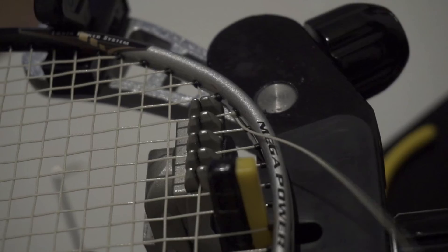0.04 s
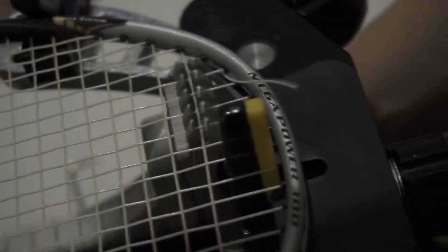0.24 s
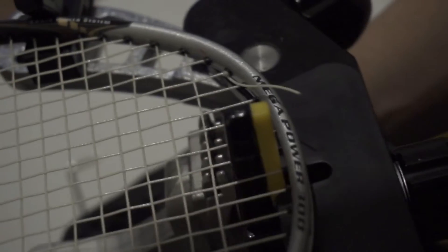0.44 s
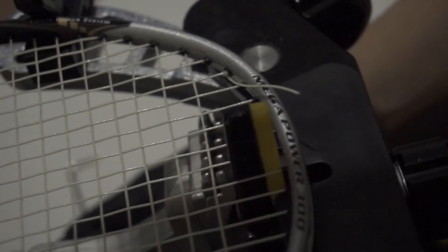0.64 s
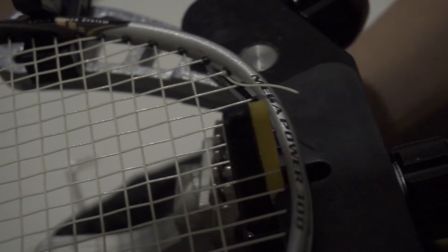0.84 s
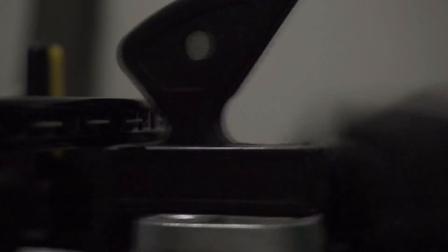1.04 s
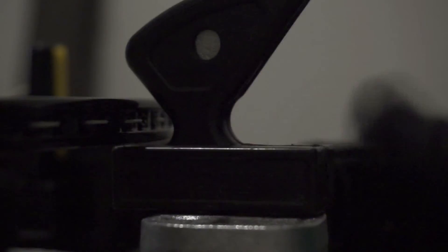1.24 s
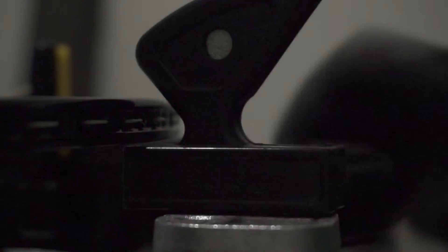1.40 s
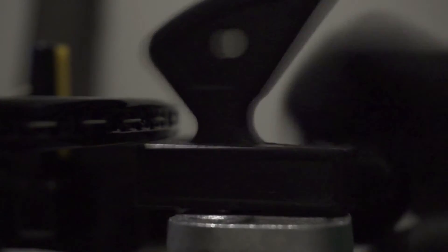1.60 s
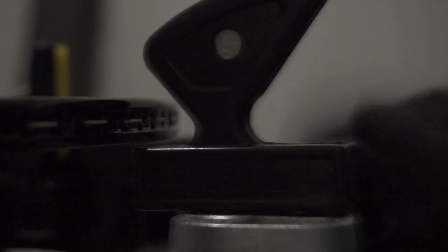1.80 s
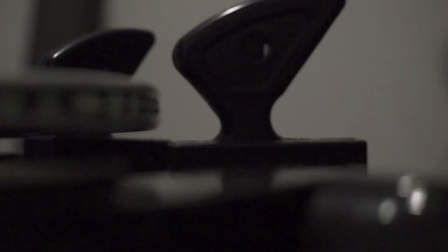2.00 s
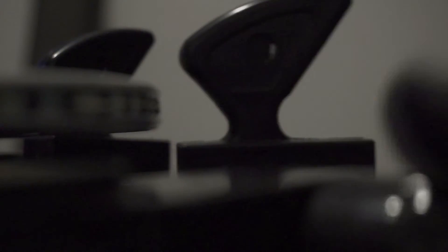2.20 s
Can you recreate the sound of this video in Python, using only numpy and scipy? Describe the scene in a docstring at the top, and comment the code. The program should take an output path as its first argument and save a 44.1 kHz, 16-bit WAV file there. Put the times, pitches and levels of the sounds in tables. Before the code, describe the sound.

A steel clamp on a racquet stringing machine chinks, slides and clacks shut, then its lever snaps over and the racquet rings briefly. Softer knocks and short creaks follow from the mount, heard close in a small, live room.

```python
"""A soft, low knock comes first, then a steel string clamp chinks, slides and clacks shut.
We are close to a racquet stringing machine in a small, live room, the machine a little left of the
microphone. The lever snaps over and the strung racquet rings. Then the mount is adjusted: short
stick-slip creaks run into soft knocks on the hollow base. Small metal pings sound along the way,
and one tiny metal tick comes last, over faint room noise."""
import sys
import numpy as np
from scipy import signal
from scipy.fft import rfft, irfft
from scipy.io import wavfile

SR = 44100
rng = np.random.default_rng(int(sys.argv[2]) if len(sys.argv) > 2 else 0)


def to_wav(sig):
    """Store sig (one row per channel, or 1-D mono) as 16-bit WAV at the path in sys.argv[1].

    Samples outside -1..1 are clipped; the rate is SR.
    """
    pcm = np.clip(np.atleast_2d(sig), -1, 1) * 32767
    pcm = np.round(pcm).astype(np.int16)
    wavfile.write(sys.argv[1], SR, pcm.T)  # frames by channels


N = 103635
T = np.arange(N) / SR

# the room's decay: freq_hz, t60_s
ROOM_T60 = [(150, 0.2), (500, .5), (1200, 0.4948), (3000, .5), (6000, 0.4551), (11000, 0.31)]
# the colour of its tail: freq_hz, gain_db
ROOM_TONE = [(100, -3.5), (200, 3.5), (500, 3.5), (1000, -2), (2000, 1.5), (4000, 6.5), (7000, 2),
             (11000, 2)]
# its stereo width at the microphone: freq_hz, side_over_mid_db
ROOM_WIDTH = [(200, -15), (700, -7.5), (1400, -2.5), (2800, 0.5), (6000, -0.5), (11000, -3.5)]
# spectrum of the quiet room: freq_hz, relative_db
ROOM_NOISE = [(30, -30), (100, -20), (250, -4.5), (500, 14.5), (800, 4), (1400, 5.5), (3000, -6),
              (5000, -8.5), (11000, -10)]
# metal pings and low tones of soft knocks: start_s, level_db, pitch_hz, swell_s, t60_s, room_send_db
PITCHED_RINGS = [(0.001, -25, 660, .002, .08, -2), (0.168, -15, 1020, .005, .04, -2),
                 (0.556, -34, 740, .004, .06, 0), (0.166, -9, 10660, .002, .05, -9.5),
                 (0.2843, -10.5, 5390, 0.0014, 0.039, -5), (0.319, -7.5, 3200, .0005, 0.021, -3),
                 (0.321, -13, 5250, .0005, .03, -9), (0.321, -15.5, 8280, .0005, 0.021, -2.5),
                 (1.297, -24, 2500, 0.0025, .02, -2), (1.493, -32, 1650, .001, .015, -6),
                 (1.564, -34.5, 5400, 0.00085, 0.026, 1.5), (1.824, -37, 3722, 0.043, 0.1, -5.5),
                 (1.96, -34, 1284, .05, 0.22, -7.5), (2.018, -33, 530, .005, .03, 3),
                 (2.077, -30.5, 1450, .002, .035, -7)]
# knocks on the base: start_s, level_db, bass_db, bite_db, treble_db, grind_s, room_send_db, ring_db
BASE_KNOCKS = [(0.002, -25, 14.5, -6.5, 0, 0.0026, 7, -20), (0.867, -19.5, -5, -4.5, -12, .005, 1, -10.5),
               (0.911, -27, 5, 1, -6, 0.0036, -18, -18), (1.033, -20, 2, 0.5, -1, 0.007, 2.5, -1.5),
               (1.056, -29.5, 13, -1, 8, 0.009, 6.5, -0.5), (1.24, -30.5, 11, 2, 2, .008, 1.5, 2),
               (1.300, -15, -1, 1.5, -6, 0.0083, 2, -4), (1.493, -27.5, -1.5, -1, -1.5, 0.0041, -1, -1.5),
               (1.562, -17, -1.5, -3, 3, 0.0015, 4, 3), (1.577, -20.5, 4.5, -6, 0, 0.0047, -3.5, -5),
               (1.757, -30, -3, 7, 10, .004, 1, -1), (1.832, -32.5, 9, -1.5, -0.5, 0.0033, 2.5, 0.5),
               (2.019, -37.5, -2, -9, -5.5, 0.0023, -4.5, 8.5), (2.077, -34, -11, -18, -8, 0.0018, -0.5, 9)]
# creaks of the mount: start_s, length_s, level_db, bass_db, bite_db, treble_db
MOUNT_CREAKS = [(0.881, 0.08, -60.5, -2.5, -4, -19), (0.996, 0.029, -54, 2.5, -1, -2),
                (1.266, 0.065, -54.5, 9.5, 1.5, 8), (1.526, 0.042, -48.5, -10.5, 4.5, -1),
                (1.781, 0.059, -59, 4.5, 1, 5.5), (1.87, 0.061, -69, -2, -9, -6)]
# broad resonances of the hollow base: centre_hz, width_hz, gain_db
BASE_BODY = [(231.5, 61, -6.5), (515, 95, -1), (880, 190, -6.5), (1158, 128, 4.5), (1577, 196, 2.5),
             (2260, 278, -0.5), (2624, 496, -4), (3970, 133, -23), (5400, 200, -45), (10260, 1200, -28.5)]
# long ringing modes of the base: pitch_hz, gain_db, t60_s
BASE_MODES = [(240, -16.5, 0.5), (274, -14, 0.36), (452, -5.5, 0.42), (495.8, 3.5, 0.42),
              (514.5, 1.5, 0.37), (576, -2.5, 0.4), (591.4, -12, 0.32), (1130, -13.5, 0.39),
              (1172, -13.5, 0.31), (1417, -9, 0.46), (1470, -8.5, .4), (1533, -9.5, 0.29)]
# blows of the clamp: start_s, level_db, bass_db, bite_db, treble_db, grind_s, room_send_db, ring_db
CLAMP_CLACKS = [(0.0445, -17, -6.5, -4.5, -7, 0.0062, 7, -9), (0.056, -26.5, 18, -4, -9, 0.0059, -3, 1),
                (0.167, -8, 7, -3, 22.5, 0.0085, -0.5, -23.5),
                (0.1755, -5.5, -8, 1, 17.5, 0.012, -16.5, -24),
                (0.184, -9, -8.5, 0, -3.5, 0.003, -1, -13.5),
                (0.217, -10, -14.5, -2.5, 0, 0.0072, 1.5, -7.5),
                (0.286, -12.5, 4.5, 1, 8.5, 0.005, -2.5, -6), (0.291, 2, 0, -3.5, 2, 0.0017, -2.5, 0.5),
                (0.320, -4.5, 1.5, 4, 7.5, 0.0038, -3.5, -23.5), (0.368, -9, 12.5, -1, 3, 0.0021, -1, -11),
                (0.681, -32, -3, -3, -4, .004, -3, -15), (0.687, -22.5, -14, -6, -8.5, 0.0053, 14, 5),
                (0.694, -0.5, -11.5, -1, -6.5, 0.0016, -1.5, 1.5),
                (0.769, -12, -4, 8, -1.5, 0.0026, 3.5, 5)]
# slides of the clamp: start_s, length_s, level_db, bass_db, bite_db, treble_db
CLAMP_SLIDES = [(0.189, 0.12, -44.5, -4.5, 0.5, 3), (0.711, 0.14, -44.5, -5.5, 2.5, -20)]
# broad resonances of the steel clamp: centre_hz, width_hz, gain_db
CLAMP_BODY = [(185, 126, -14.5), (546, 87, 0), (830, 130, 0), (1140, 153, 2.5), (1460, 140, -1),
              (1720, 220, -3), (2290, 390, -6), (3070, 590, -7.5), (4460, 350, -14), (4980, 460, -12),
              (6730, 1600, -17), (8160, 1320, -16), (10800, 900, -21)]
# long ringing modes of the strung racquet: pitch_hz, gain_db, t60_s
RACQUET_MODES = [(181.1, -20, .6), (493.4, -8.5, 0.79), (534, -10.5, 0.38), (582, 1, 0.31),
                 (629, 0.5, 0.21), (814, -7, 0.34), (913, -14.5, 0.79), (949, -5, 0.21), (1120, 1, 0.25),
                 (1401, -13, 0.3), (1753, -10.5, 0.33), (1870, -22.5, 0.5), (3037, -15.5, .4),
                 (3145, -13.5, .4), (3230, -16, .45)]
# pushes of the clamp on the stand: start_s, level_db
STAND_THUMPS = [(0.169, -37.5), (0.695, -33)]
# the stand's low resonance: centre_hz, width_hz, gain_db
STAND_BODY = [(60, 50, 0)]
# brief dips in level (a negative depth is a lift): centre_s, half_width_s, depth_db
LEVEL_DIPS = [(0.159, 0.0022, 19), (0.86, 0.0034, -1)]

BASS_HZ, BITE_HZ, TREBLE_HZ, BITE_DAMPING = 477, 2700, 4500, 0.8   # tone of each blow and rub
GRIT_HZ, GRIT_DB = 1390, 0.5   # metal faces grind as they meet: click below GRIT_HZ, grit above
SLIPS_PER_S, RUB_ROOM_DB = 900, -1


def from_db(db):
    """Decibels to gain."""
    return 10 ** (np.asarray(db) / 20)


def at_hz(points, hz):
    """Read a table on a log-frequency axis."""
    freqs, values = np.transpose(points)
    return np.interp(np.log(hz + 1e-9), np.log(freqs), values)


def unit(x):
    """Scale to an energy of one."""
    return x / np.sqrt(np.sum(x ** 2) + 1e-20)


def add(track, start_s, x):
    """Mix a sound into a track at a time."""
    i = int(start_s * SR)
    track[i:i + len(x)] += x[:N - i]


def butter(x, hz, kind):
    """Second-order filter."""
    return signal.sosfilt(signal.butter(2, hz, kind, fs=SR, output="sos"), x + 1e-18)


def tone(x, bass_db, bite_db, treble_db):
    """A low shelf, a high shelf and a broad peak between them for the hard bite."""
    for hz, low_db, high_db in ((BASS_HZ, bass_db, 0), (TREBLE_HZ, 0, treble_db)):
        w, g = 2 * SR * np.tan(np.pi * hz / SR), from_db((low_db - high_db) / 4)
        shelf = [1, np.sqrt(2) * w * g, (w * g) ** 2], [1, np.sqrt(2) * w / g, (w / g) ** 2]
        x = from_db(high_db) * signal.lfilter(*signal.bilinear(*shelf, SR), x)
    w, g = 2 * np.pi * BITE_HZ, from_db(bite_db / 2)
    peak = [1, BITE_DAMPING * w * g, w * w], [1, BITE_DAMPING * w / g, w * w]
    return signal.lfilter(*signal.bilinear(*peak, SR), x)


def body(force, resonances):
    """A force drives broad resonances in parallel, signs alternating."""
    out = 0
    for k, (hz, width_hz, db) in enumerate(resonances):
        radius = np.exp(-np.pi * width_hz / SR)
        feedback = [1, -2 * radius * np.cos(2 * np.pi * hz / SR), radius ** 2]
        band = (1 - radius ** 2) / 2 * signal.lfilter([1, 0, -1], feedback, force + 1e-18)
        out += (-1) ** k * from_db(db) * band
    return out


def mode(hz, swell_s, t60_s):
    """A sine that swells and dies away."""
    t = T[:SR]
    return np.sin(2 * np.pi * hz * t) * (1 - np.exp(-t / swell_s)) * from_db(-60 * t / t60_s)


def wide_noise(size):
    """Frequencies and spectrum of stereo noise, narrow in the bass and wide in the treble."""
    hz = np.linspace(0, SR / 2, size // 2 + 1)
    mid, side = rfft(rng.standard_normal((2, size)))
    width = from_db(at_hz(ROOM_WIDTH, hz))
    return hz, (mid + side * width * [[1], [-1]]) / np.sqrt(1 + width ** 2)


def room_noise(rms_db=-64.5):
    """The place itself: steady faint noise and hiss all round the microphone."""
    hz, noise = wide_noise(N)
    hiss = irfft(noise * from_db(at_hz(ROOM_NOISE, hz)), N)
    return from_db(rms_db) * np.sqrt(2 * N) * unit(hiss)


def room_tail(x, build_s=0.0029):
    """The near walls answer with a diffuse tail that dies band by band."""
    t, tail = T[:SR], 0
    hz, noise = wide_noise(SR)
    edges = np.geomspace(60, 13000, 24)
    for low, high in zip(edges, edges[1:]):
        centre = np.sqrt(low * high)
        band = irfft(noise * ((hz >= low) & (hz < high)), SR)
        envelope = (1 - np.exp(-t / build_s)) * from_db(-60 * t / at_hz(ROOM_T60, centre))
        gain = 2 * np.sqrt((high - low) / SR) * from_db(at_hz(ROOM_TONE, centre))
        tail += gain * unit(band * envelope)
    return signal.fftconvolve(x[None], tail, axes=1)[:, :N]


def pitched_rings():
    """Brief pitched rings, straight ahead: small metal pings and the short low tones of soft knocks."""
    direct, send = np.zeros((2, N))
    for start_s, db, hz, swell_s, t60_s, room_db in PITCHED_RINGS:
        ring = from_db(db) * unit(mode(hz, swell_s, t60_s))
        add(direct, start_s, ring)
        add(send, start_s, from_db(room_db) * ring)
    return direct + room_tail(send)


def machine_part(blows, rubs, resonances, modes, ring_db, swell_s, left_db):
    """Blows and stick-slip rubs drive a body, long modes ring on after each blow, the room answers."""
    def response(force, colour):
        """The body's answer to a force, deep bass rolled off, with an energy of one."""
        return unit(tone(butter(body(force, resonances), hz=130, kind="high"), *colour))

    direct, send, strikes = np.zeros((3, N))
    t = T[:SR // 10]
    click = 1.0 * (t == 0)
    for start_s, db, *colour, grind_s, room_db, blow_ring_db in blows:
        grit = unit(rng.standard_normal(len(t)) * np.exp(-t / grind_s))
        force = butter(click, GRIT_HZ, "low") + from_db(GRIT_DB) * butter(grit, GRIT_HZ, "high")
        add(direct, start_s, from_db(db) * response(force, colour))
        add(send, start_s, from_db(db + room_db) * response(click, colour))
        add(strikes, start_s, from_db([db + blow_ring_db + ring_db]))
    t = T[:SR // 4]
    for start_s, length_s, db, *colour in rubs:
        slips = (rng.random(len(t)) < SLIPS_PER_S / SR) & (t < length_s)
        force = slips * rng.choice([-1, 1], len(t))
        rub = from_db(db) * np.sqrt(length_s * SR) * response(force, colour)
        add(direct, start_s, rub)
        add(send, start_s, from_db(RUB_ROOM_DB) * rub)
    ring = sum(from_db(db) * (-1) ** k * mode(hz, swell_s, t60) for k, (hz, db, t60) in enumerate(modes))
    ringing = signal.fftconvolve(strikes, ring)[:N]
    pan = from_db([[left_db / 2], [-left_db / 2]])
    return (direct + ringing + room_tail(send)) * pan


def hollow_base():
    """Left of centre, soft knocks and the mount's creaks sound through the hollow base."""
    return machine_part(BASE_KNOCKS, MOUNT_CREAKS, BASE_BODY, BASE_MODES,
                        ring_db=-25.5, swell_s=0.027, left_db=3)


def string_clamp(stop_s=0.8633, fade_s=0.018):
    """Near centre, steel jaws clack and slide and the racquet rings; ring and room tail stop short."""
    sound = machine_part(CLAMP_CLACKS, CLAMP_SLIDES, CLAMP_BODY, RACQUET_MODES,
                         ring_db=-33, swell_s=0.0098, left_db=1)
    return sound * np.clip((stop_s - T) / fade_s, 0, 1)


def stand_thumps():
    """The stand takes the push of the clamp with a faint low thud."""
    out = np.zeros(N)
    thud = unit(body(signal.unit_impulse(SR // 4), STAND_BODY))
    for start_s, db in STAND_THUMPS:
        add(out, start_s, from_db(db) * thud)
    return out


def metal_tick(start_s=2.164, level_db=-40.5, centre_hz=9030, width_hz=1800, decay_s=0.00068):
    """A tiny metal contact, close and dry: a burst of noise through one bright resonance."""
    out, t = np.zeros(N), T[:SR // 20]
    force = rng.standard_normal(len(t)) * np.exp(-t / decay_s)
    add(out, start_s, from_db(level_db) * unit(body(force, [(centre_hz, width_hz, 0)])))
    return out


def scene():
    """Everything that reaches the microphone."""
    return (room_noise() + pitched_rings() + hollow_base() + string_clamp()
            + stand_thumps() + metal_tick())


def record(dry, cutoff_hz=11050):
    """The level dips briefly, later lifts slightly for an instant, and the top is cut steeply."""
    dip_db = sum(depth * np.exp(-((T - s) / width) ** 2) for s, width, depth in LEVEL_DIPS)
    lowpass = signal.ellip(10, .2, 70, cutoff_hz, fs=SR, output="sos")
    return signal.sosfilt(lowpass, dry * from_db(-dip_db))


dry = scene()
out = record(dry)
to_wav(out)
```